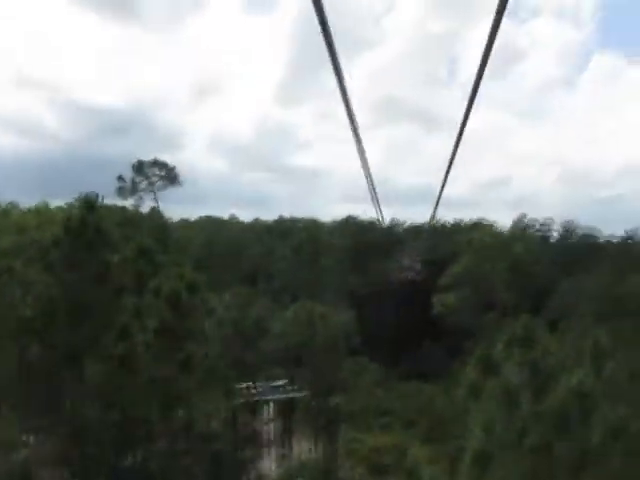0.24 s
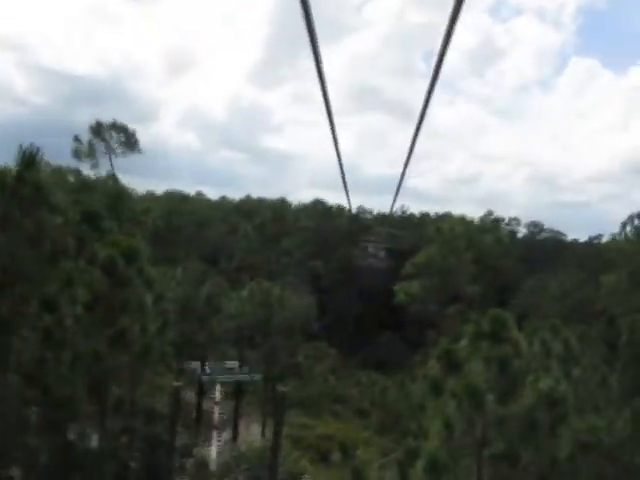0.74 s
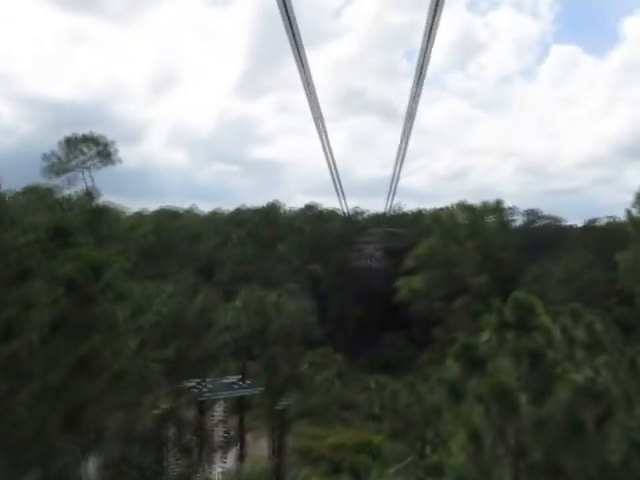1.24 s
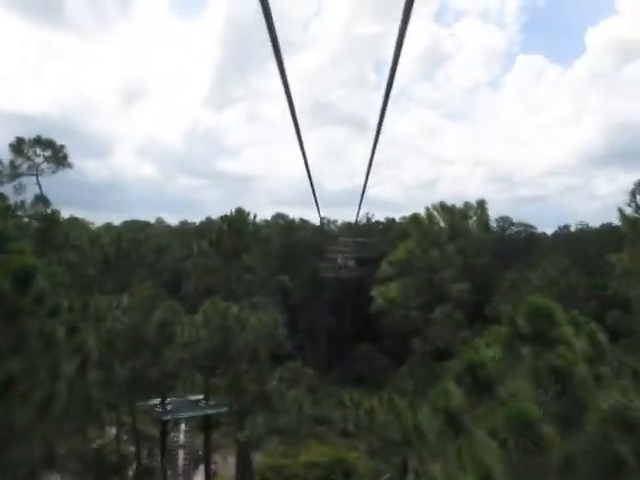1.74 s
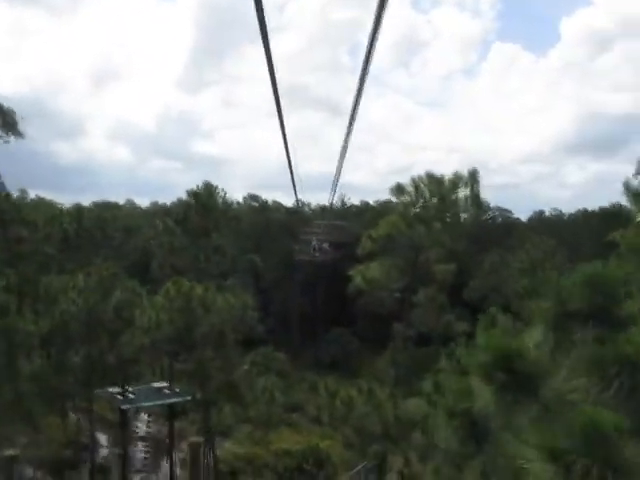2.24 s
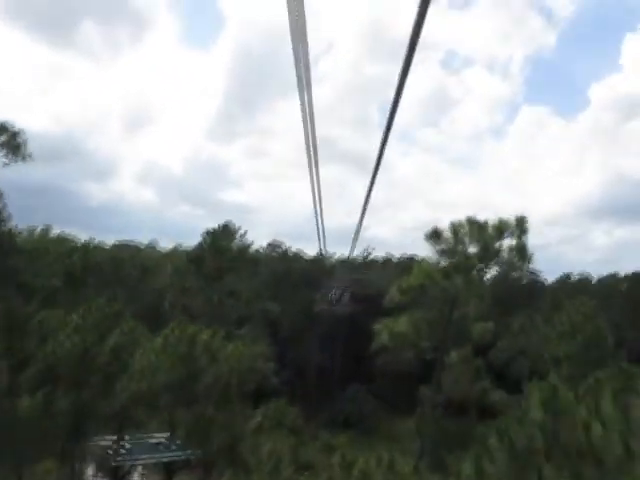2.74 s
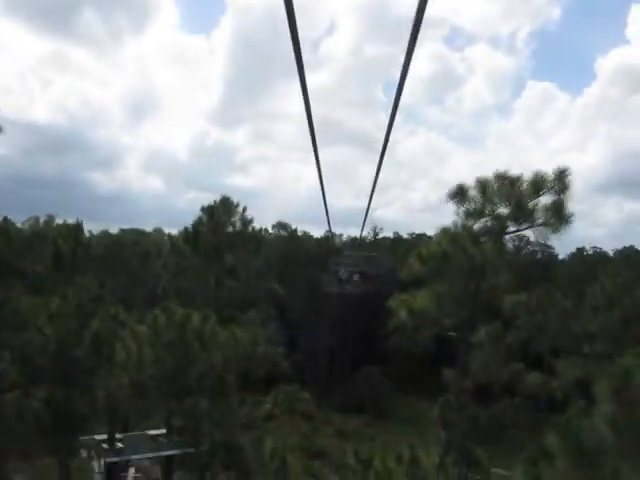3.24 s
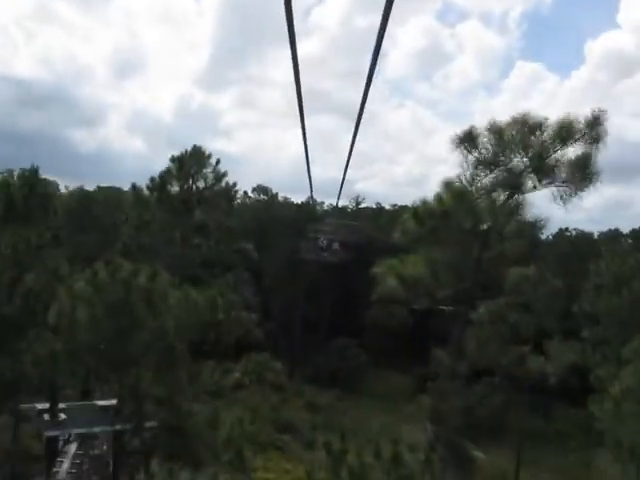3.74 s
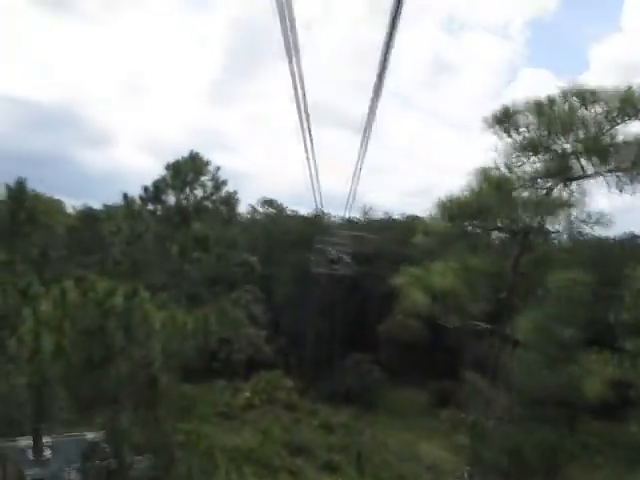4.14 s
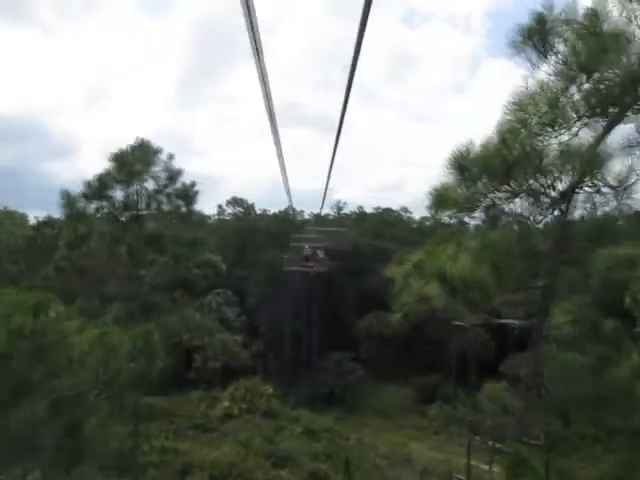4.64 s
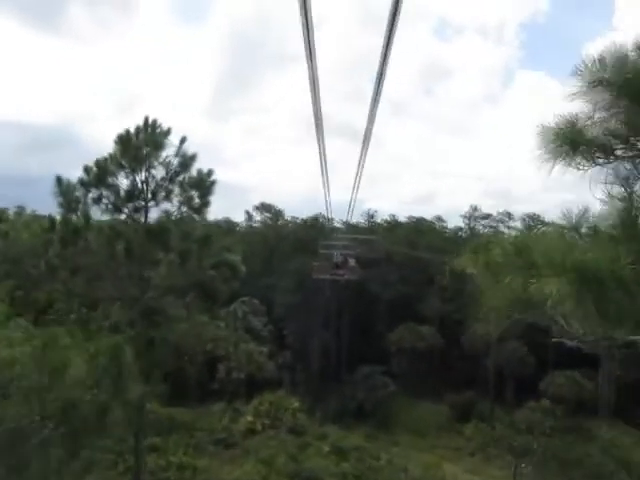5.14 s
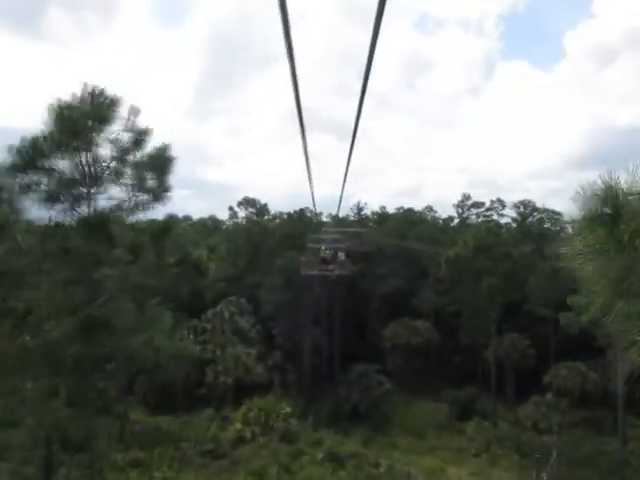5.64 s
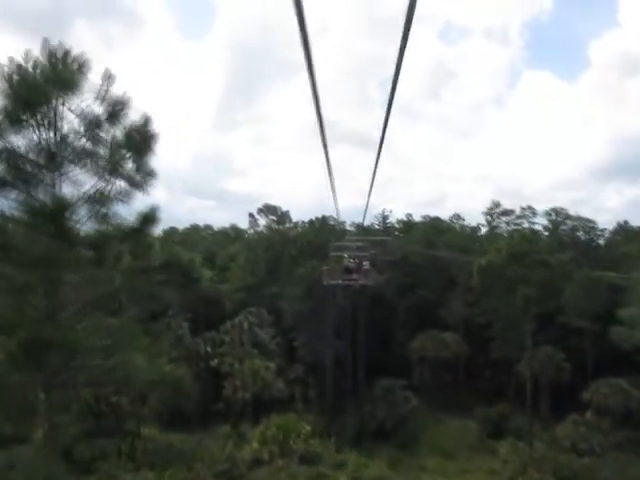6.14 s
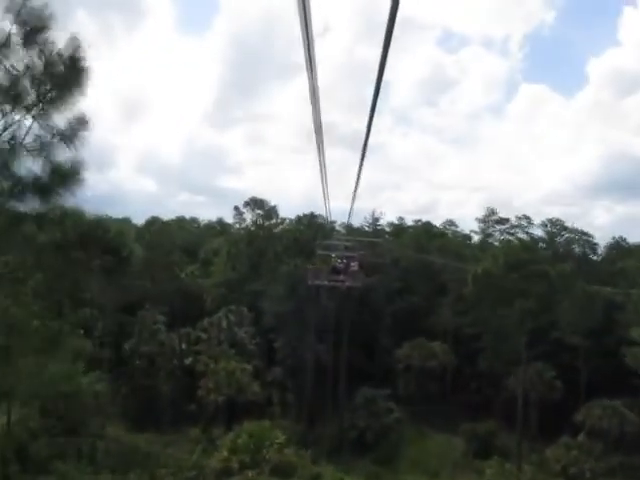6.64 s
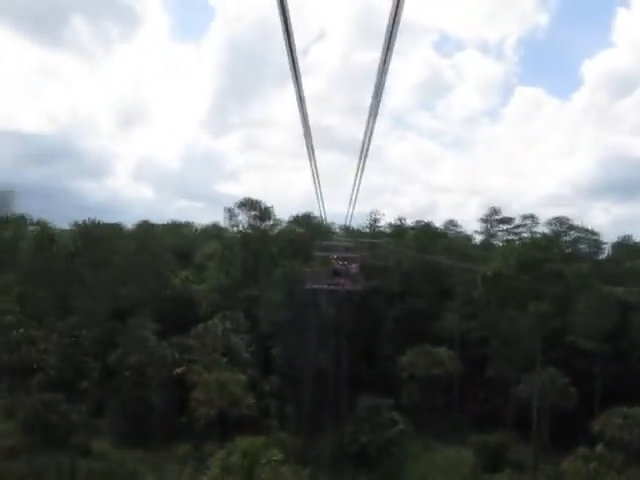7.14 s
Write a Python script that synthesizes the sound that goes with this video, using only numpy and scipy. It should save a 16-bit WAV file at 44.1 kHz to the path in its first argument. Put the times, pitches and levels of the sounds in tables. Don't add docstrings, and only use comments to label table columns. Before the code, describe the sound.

Close onboard sound of a zipline ride above trees. A low metallic drone already sounds at the start and slides upward throughout, wavering and pulsing as the wheels bite the cable. The early ringing metal chatter calms midway while the whine grows purer and louder. Wind buffets a small, slightly gritty microphone; a cluster of knocks comes near six seconds and another near the end.

```python
import sys
import numpy as np
from scipy import signal
from scipy.io import wavfile
from scipy.ndimage import uniform_filter1d, map_coordinates

SR = 44100
rng = np.random.default_rng(int(sys.argv[2]) if len(sys.argv) > 2 else 0)


def waveform_to_disk(signal):
    frames = np.transpose(np.atleast_2d(signal))
    scaled = np.clip(frames, -1, 1) * 32767
    samples = np.round(scaled).astype(np.int16)
    wavfile.write(sys.argv[1], SR, samples)


def elevation(decibels):
    levels = np.asarray(decibels, float)
    return 10 ** (levels / 20)


N = 326340

# centre in seconds, change in Hz,
# half length in seconds.
SPEED_TUGS = [(0, -6, 0.1019), (.281, -10.5, .09), (.786, 4, 0.1211), (1.506, -4, 0.0374), (2.104, 7, .08),
              (2.31, 6.5, .033), (2.41, -13, .035), (2.495, 3, .03), (2.6, -10.5, .04), (3.064, 4, 0.03156),
              (3.391, 6, .357), (3.488, 7, 0.03683), (3.687, 7.5, 0.04234), (4.137, -3.5, 0.0268),
              (4.44, 3.5, 0.0495), (4.883, -4, 0.0474), (5.118, -6.5, 0.0576), (5.25, 4, .314),
              (5.686, -6, .122), (6.263, -6, .086), (6.533, -6, 0.0451), (6.774, -8, .083),
              (7.133, 5.5, .056), (7.215, -19.5, .167)]
CABLE_FLICKS = [0.649, 0.849, 1.041, 1.38, 1.628, 1.85, 2.68, 3.27, 4.02, 5.52, 6.58, 6.93]
# centre in seconds, change in dB, half length in seconds.
GRIP_BOUNCES = [(.2, -4, 0.1), (.27, -1.5, 0.015), (.475, -2, 0.0077), (.42, 0.5, 0.067), (.68, 1, 0.15),
                (.86, -5, 0.019), (1.06, -3.5, 0.016), (1.38, 0.5, 0.016), (1.75, -1, 0.16),
                (2.18, 1, 0.046), (2.64, -2, 0.015), (2.78, 2.5, 0.029), (3.25, 0.5, 0.14),
                (5.9, 0.5, 0.011), (6.11, -0.5, 0.012), (7.04, 0, .02)]
# time in seconds, level in dB.
WHEEL_LOAD = [(0.0, 5.5), (0.4, -5), (0.75, 1), (0.9, 0.5), (1.2, 2), (1.6, -1), (2.0, 2.5), (2.4, 1.1),
              (2.8, -0.5), (3.3, 0.5), (4.0, 1.5), (4.7, 1), (5.4, 3), (6.2, -2), (7.4, -2)]

# level in dB at 450 crossings a second, slope in dB per octave of speed.
WHINE_LINES = [
    (-0.0, 1),
    (10, 12.5),
    (2.5, 5.5),
    (1.5, 5.5),
]
# multiple of the strand rate, level in dB.
WEAK_LINES = [(.41, -61), (1.5, -54), (2.5, -61), (3.5, -53), (4.5, -58), (5, -52), (5.5, -56)]
# frequency in Hz, half width in Hz, lift in dB.
WEAK_LINE_LIFT = [(840, 70, 8), (1320, 90, 5)]
# frequency in Hz, half width in Hz, level in dB.
TROLLEY_MODES = [(184, 19.7, -31.5), (318, 27.4, -30), (429, 67, -29.5), (457.2, 14, -29),
                 (492, 8.7, -34.5), (524, 41, -30.5), (700, 85.0, -35.5), (797, 50, -38.5), (932, 42, -35),
                 (1050, 32, -54), (1254, 69, -42.5), (1354, 59, -38), (1900, 241.8, -46)]
# frequency in Hz, half width in Hz, level in dB.
GAP_MODE = (1075, 70, -47)
# centre in seconds, change in dB,
# half length in seconds.
WHEEL_BEATS = [
    [(.13, 2, 0.038), (.105, -10, .012), (.235, -15, 0.024), (.37, 4, 0.015), (1.42, -6, 0.027),
     (1.8, 3.5, 0.1), (5.91, 0.5, 0.0076), (7.19, -1, 0.072)],
    [(.04, -16, 0.025), (.3, 2, 0.065), (.59, 7, 0.022), (.74, -7, 0.13), (.84, 4, 0.028),
     (1.0, 4.5, 0.054), (1.055, -1, 0.0097), (1.19, -5.5, 0.027), (1.29, 0, .025), (1.58, 2.5, 0.027),
     (1.7, -1.5, 0.05), (1.8, 3.5, 0.056), (2.09, -18, 0.032), (2.24, -2, 0.028), (2.32, -6.5, .04),
     (2.42, -4, .04), (2.87, 2, 0.037), (3.35, -1, 0.057), (3.57, -3.5, 0.027), (3.85, -6, 0.1),
     (4.25, 1, 0.07), (5.45, -1, 0.04), (6.9, 0.5, 0.09), (7.08, -2.5, 0.029)],
    [(.06, -2, .06), (.26, -4, .05), (.48, 12.5, 0.1), (.66, -14, .04), (.85, -5, .08), (1.16, -21, 0.047),
     (1.33, 1.5, .05), (1.45, -7, 0.049), (1.58, 11.5, 0.27), (1.93, 6, 0.03), (2.04, -14, .03),
     (2.15, -1, 0.05), (2.3, -9, 0.072), (2.43, 6, 0.03), (2.59, 4, .03), (2.67, -14, 0.027),
     (3.0, -0.5, 0.16), (3.5, -11, .1), (3.85, 7, 0.077), (4.1, 1, .05), (4.24, 5, 0.036), (5.35, -1, .06),
     (5.6, -5.5, 0.11), (5.93, 0, .06), (6.69, -4, 0.035)],
    [(.47, -10, 0.073), (1.6, -5, 0.18), (2.15, 8.5, 0.034), (2.32, -12, 0.033), (2.68, 1.5, .06),
     (2.98, 7, .03), (3.72, 12, 0.036), (4.25, 12, 0.14), (5.1, 1.5, .1), (5.59, 2.5, .03), (5.8, 6, 0.044),
     (6.85, 3, 0.087), (7.1, -6, 0.094)],
]
# centre in seconds, first line change in dB, second line change in dB.
WHEEL_SLIPS = [
    (5.545, 0, -4),
    (5.906, 3.5, -6),
    (6.018, 2.5, -1),
    (6.118, 1, -5),
    (6.128, -4, 0),
    (7.033, -5, -4),
    (7.043, 3, 0),
]
# multiple of the strand rate, width in multiples,
# level in dB relative to the line.
LINE_SKIRTS = [(1, .45, -21.5), (2, .45, -30.5), (1.83, .12, -22), (1.17, .08, -25.5), (.83, .08, -23.5)]

# frequency in Hz, width in Hz, level in dB.
FRAME_MODES = [(493, 137, -1.5), (849, 113, 3), (1285, 98, -4.5), (1584, 100, -8.5), (2170, 240, -4.5)]
# centre in seconds, change in dB, half length in seconds.
FRAME_SHAKES = [
    [(.07, 3, 0.056), (.55, 0, .1), (.8, 2.5, 0.065), (2.3, -1, 0.087), (2.45, 3.5, 0.034)],
    [(.06, 1.5, .05), (.17, -3, .04), (.31, 8, .025), (.38, 1, .025), (.44, 3.5, 0.019), (.58, 2, .03),
     (.65, 1, .06), (.95, 1.5, 0.055), (1.35, -1.5, 0.13), (1.75, -1, 0.073), (2.15, 0.5, .06),
     (2.27, -0.5, 0.03), (2.33, 2.5, .015), (2.85, 2, 0.086), (3.1, 2, 0.073), (3.35, 3.5, 0.054)],
    [(.03, 4, .04), (.17, -5.5, .07), (.37, 5, 0.083), (.7, 5, 0.093), (1.1, 0.5, 0.068),
     (1.75, -1.5, 0.21), (2.3, -5, .07), (2.9, 4, 0.12), (3.4, -1.5, .1)],
    [(.6, 3.5, 0.11), (2.1, 3, 0.091), (3.1, 7, .1)],
    [(.15, -3, .08), (1.45, -2, 0.13), (2.2, -2, 0.089), (3.9, 0.5, 0.1)],
]
# frequency in Hz, width in Hz, level in dB.
WHEEL_RING = (3645, 42, -47.5)
# frequency in Hz, width in Hz, level in dB, change in dB per octave off its best speed.
HANGER_HUM = (546, 109.5, -44, -26.5)
# frequency in Hz, density in dB per Hz.
HISS_SPECTRUM = [(150, -8), (300, -10.5), (600, -3.5), (1100, -7), (1500, -2.5), (2500, -2.5), (3200, -6.5),
                 (4000, -5), (4700, -6), (5100, -12.5), (5500, -16)]
# frequency in Hz, width in Hz, added share in dB.
PORT_RESONANCE = (4530, 410, -2.8)

BEARING_HUMPS = [
    (5.2, 1.1),
    (6.4, .9),
]
BALL_LINES = (5.29, 6.29, 6.6)
# crossings in Hz, spread in Hz, level awake in dB, level asleep in dB.
BEARING_WAKES = [
    (385.3, 8, -42, -53.5),
    (429, 8, -43, -50),
]
# frequency in Hz, half width in Hz, lift in dB.
BEARING_LIFT = [(880, 63, 20.5), (2036, 60, 8.5)]
# centre in seconds, change in dB, half length in seconds.
BEARING_SURGES = [
    (5.65, -4, 0.12),
    (6.05, 2, 0.092),
    (6.8, 6, 0.1),
    (7.2, 2.5, 0.11),
]

# centre in seconds, peak in dB, half length in seconds.
WIND_GUSTS = [(0.553, -45, 0.059), (0.802, -48, 0.28), (1.295, -42.5, 0.053), (1.432, -43, 0.033),
              (1.65, -43.5, 0.2), (1.93, -49, 0.097), (2.203, -48, 0.1), (2.82, -52, 0.067),
              (3.24, -48.5, .13), (3.756, -41, 0.061), (4.0, -64, .1), (4.353, -47, 0.23),
              (5.003, -45.5, 0.072), (5.7, -63.5, 0.17), (6.0, -48.5, 0.18), (6.12, -51, 0.044),
              (6.24, -41, 0.04), (6.55, -49, 0.1), (6.852, -52, 0.069), (7.08, -50, 0.067),
              (7.4, -53, 0.029)]
# frequency in Hz, density in dB per Hz.
WIND_SPECTRUM = [(12, -52.5), (20, -18.5), (22, -9), (103, -1.5), (161, -3), (210, 3), (230, -8.5),
                 (300, -16), (510, -120)]
# centre in seconds, peak in dB, half length in seconds.
WIND_PUFFS = [
    (0.297, -56, 0.084),
    (1.75, -42, 0.19),
    (5.493, -44, 0.019),
    (5.902, -52, 0.043),
    (6.105, -39.5, 0.078),
    (6.26, -40.5, 0.034),
    (6.994, -46, 0.18),
]
# frequency in Hz, density in dB per Hz.
PUFF_SPECTRUM = [(200, -13.5), (300, -1), (390, 9.5)]
# peak time in seconds, level in dB, rise in seconds, fall in seconds.
LAUNCH_SHUDDER = (0.235, -23, 0.11, 0.03)
# time in seconds, peak in dB.
CABLE_KINKS = [
    (2.02, -28),
    (5.903, -22),
    (6.01, -28),
    (6.118, -24),
    (7.039, -26),
]
# frequency in Hz, width in Hz, level in dB.
KINK_MODES = [
    (640, 200, -4),
    (2200, 500, -2),
]


def rms_one(x):
    return x / np.sqrt(np.mean(x ** 2) + 1e-20)


def in_time(rows):
    s, *columns = np.transpose(rows)
    return [np.interp(np.arange(N) / SR, s, c) for c in columns]


def bumps(rows):
    t = np.arange(0, N + 64, 64) / SR
    total = 0
    for s, height, half_s in rows:
        total = total + height * np.exp(-.5 * ((t - s) / max(half_s, .004)) ** 2)
    return np.interp(np.arange(N) / SR, t, total)


def drift(rate):
    r = np.exp(-40 * np.pi * rate / SR)
    noise = rng.standard_normal(N // 20 + 4002)
    slow = signal.lfilter([1], [1, -2 * r, r * r], noise)[4000:]
    return np.interp(np.arange(N) / 20, np.arange(len(slow)), rms_one(slow))


def resonance(x, hz, width_hz):
    r = np.exp(-np.pi * width_hz / SR)
    poles = [1, -2 * r * np.cos(2 * np.pi * hz / SR), r * r]
    return rms_one(signal.lfilter([1, 0, -1], poles, x))


def through(modes, hz):
    return sum(elevation(2 * db) / (1 + ((hz - mode_hz) / width_hz) ** 2) ** 2 for mode_hz, width_hz, db in modes)


def banded(white, spectrum, patchy_db):
    hz, level_db = np.transpose(spectrum)
    count = round(3 * np.log2(hz[-1] / hz[0]))
    edges = np.geomspace(hz[0], hz[-1], count + 1)
    out = 0
    for k, (low, high) in enumerate(zip(edges, edges[1:])):
        sos = signal.butter(2, [low, high], "band", fs=SR, output="sos")
        band = signal.sosfilt(sos, white[k % 2])
        band_db = np.interp(np.log(low * high) / 2, np.log(hz), level_db)
        out = out + elevation(band_db + patchy_db * drift(7.2)) * band
    return rms_one(out)


def roar(turns, multiple, width):
    pair = rng.standard_normal((2, 6000))
    a, b = (np.interp(turns * width, np.arange(pair.shape[1]), p) for p in pair)
    phase = 2 * np.pi * multiple * turns
    return rms_one(a * np.cos(phase) + b * np.sin(phase))


def motion():
    top_hz, head_start, gather_s = 529.6, .309, 6.119
    rate_hz = top_hz * np.tanh(head_start + np.arange(N) / SR / gather_s) + bumps(SPEED_TUGS)
    rate_hz = rate_hz + bumps([(s, 2.2, .035) for s in CABLE_FLICKS])
    return rate_hz, np.log2(rate_hz / 450), bumps(GRIP_BOUNCES)


def line_levels(rate_hz, octaves, grip_db, load_db):
    levels_db = []
    for k, (db, slope) in enumerate(WHINE_LINES):
        passed_db = 10 * np.log10(through([*TROLLEY_MODES, GAP_MODE], (k + 1) * rate_hz))
        contact_db = load_db + .24 * grip_db + bumps(WHEEL_BEATS[k])
        levels_db.append(db + slope * octaves + contact_db + passed_db)
    for k in (0, 1):
        levels_db[k] = levels_db[k] + bumps([(row[0], row[k + 1], .005) for row in WHEEL_SLIPS])
    return levels_db


def whine(turns, rate_hz, levels_db):
    unsteady_db = 360 / rate_hz
    turns = turns + 0.021 * unsteady_db * drift(38)
    lag = .5 + .25 * unsteady_db ** 2 * drift(2.5)
    out = 0
    for k, db in enumerate(levels_db):
        flutter_db = 0.67 * unsteady_db * drift(22) + .55 * drift(55)
        out = out - elevation(db + flutter_db) * np.cos((k + 1) * 2 * np.pi * turns - lag * k)
    for multiple, level_db in WEAK_LINES:
        lift = 1
        for hz, width_hz, db in WEAK_LINE_LIFT:
            lift = lift + elevation(db) / (1 + ((multiple * rate_hz - hz) / width_hz) ** 2)
        wander_db = 4 * np.tanh(drift(2))
        out = out + lift * elevation(level_db + wander_db) * np.sin(2 * np.pi * multiple * turns)
    return np.sqrt(2) * out


def skirts(turns, levels_db):
    return sum(elevation(levels_db[round(k) - 1] + db) * roar(turns, k, width) for k, width, db in LINE_SKIRTS)


def grit(turns):
    gate = 1 + 0.031 * np.cos(2 * np.pi * turns) + 0.04 * np.cos(4 * np.pi * turns)
    gate = gate + 0.068 * np.cos(np.pi * turns)
    flutter_db = 0.59 * drift(15.0) + 0.62 * drift(140)
    return gate * elevation(flutter_db) * rng.standard_normal((4, N))


def frame_ring(contact, turns, rate_hz, octaves, grip_db, load_db):
    knocks = contact * (1 + .6 * np.cos(2 * np.pi * turns))
    frame = 0
    for k, (hz, width_hz, db) in enumerate(FRAME_MODES):
        shaken_db = db + bumps(FRAME_SHAKES[k]) + .9 * drift(90)
        frame = frame + (-1) ** k * elevation(shaken_db) * resonance(knocks, hz, width_hz)
    level_db = -25.5 - 8.5 * 2 ** (2.83 * octaves) + .71 * grip_db + .25 * load_db
    settle_db = 3.5 * (1 + np.tanh((rate_hz - 393) / 3.8)) / 2
    return elevation(level_db - settle_db) * rms_one(frame)


def wheel_ring(contact, hiss_db):
    hz, width_hz, db = WHEEL_RING
    return elevation(db + hiss_db - hiss_db.mean()) * resonance(contact, hz, width_hz)


def hanger(contact, octaves):
    hz, width_hz, db, fade_db = HANGER_HUM
    return elevation(db + fade_db * np.abs(octaves + 0.07)) * resonance(contact, hz, width_hz)


def contact_hiss(contact, hiss_db):
    port_hz, port_width_hz, port_db = PORT_RESONANCE
    hiss = banded(contact, HISS_SPECTRUM, patchy_db=0.15)
    hiss = hiss + elevation(port_db - 7.5) * resonance(contact[3], port_hz, port_width_hz)
    return elevation(hiss_db + 6.0) * hiss


def bearing(turns, rate_hz):
    lower_db, upper_db = (asleep_db + (awake_db - asleep_db) * (1 + np.tanh((rate_hz - hz) / spread_hz)) / 2
                          for hz, spread_hz, awake_db, asleep_db in BEARING_WAKES)
    (low, low_width), (high, high_width) = BEARING_HUMPS
    lower_db = lower_db + 10 * np.log10(1 + through(BEARING_LIFT, low * rate_hz))
    lower = roar(turns, low, low_width)
    lower = lower + elevation(upper_db - lower_db - 3) * roar(turns, BALL_LINES[0], width=.02)
    upper = roar(turns, high, high_width)
    upper = upper + elevation(-7) * sum(roar(turns, k, width=.025) for k in BALL_LINES[1:])
    return elevation(lower_db) * lower + elevation(upper_db + bumps(BEARING_SURGES)) * upper


def wind():
    gusts, puffs = (bumps([(s, elevation(db), half_s) for s, db, half_s in rows])
                    for rows in (WIND_GUSTS, WIND_PUFFS))
    white = rng.standard_normal((2, N))
    buffeting = np.hypot(gusts, elevation(-55.0)) * banded(white, WIND_SPECTRUM, patchy_db=-0.4)
    return buffeting + puffs * banded(white, PUFF_SPECTRUM, patchy_db=2.5)


def launch(contact):
    peak_s, db, rise_s, fall_s = LAUNCH_SHUDDER
    t = np.arange(N) / SR - peak_s
    shape = np.exp(-.5 * (t / np.where(t < 0, rise_s, fall_s)) ** 2)
    shudder = resonance(contact, hz=848, width_hz=72)
    even = shudder / uniform_filter1d(shudder ** 2, size=500) ** .3
    return elevation(db) * shape * rms_one(even)


def kinks():
    clicks = np.zeros(N) + 1e-18
    for s, db in CABLE_KINKS:
        clicks[int(s * SR)] = elevation(db)
    out = 0
    for hz, width_hz, db in KINK_MODES:
        ring = resonance(clicks, hz, width_hz)
        out = out + elevation(db) * ring / np.abs(ring).max()
    return out * clicks.max()


def trolley():
    rate_hz, octaves, grip_db = motion()
    load_db, = in_time(WHEEL_LOAD)
    turns = np.cumsum(rate_hz) / SR
    levels_db = line_levels(rate_hz, octaves, grip_db, load_db)
    tones = whine(turns, rate_hz, levels_db) + skirts(turns, levels_db)
    contact = grit(turns)
    hiss_db = -38 + 2 * octaves + grip_db
    rolling = frame_ring(contact[2], turns, rate_hz, octaves, grip_db, load_db)
    rolling = rolling + wheel_ring(contact[3], hiss_db) + hanger(contact[1], octaves)
    rolling = rolling + contact_hiss(contact, hiss_db) + launch(contact[3])
    return tones + rolling + bearing(turns, rate_hz)


def scene():
    return (trolley() + wind() + kinks())[None]


def top_cut(x):
    return signal.sosfilt(signal.butter(12, 10330, fs=SR, output="sos"), x)


def record(dry):
    decimate = 4
    x = signal.sosfilt(signal.butter(1, 60, "high", fs=SR, output="sos"), dry[0])
    x = .3 * np.tanh(x / .3)
    x = signal.sosfilt(signal.butter(8, 5400, fs=SR, output="sos"), x)[::decimate]
    cubic, straight = (map_coordinates(x, [np.arange(N) / decimate], order=order, mode="nearest")
                       for order in (3, 1))
    x = cubic + .04 * (straight - cubic) - .0019
    x = signal.sosfilt(signal.butter(1, 11000, fs=SR, output="sos"), x)
    return top_cut(x[None])


dry = scene()
out = record(dry)
waveform_to_disk(out)
```